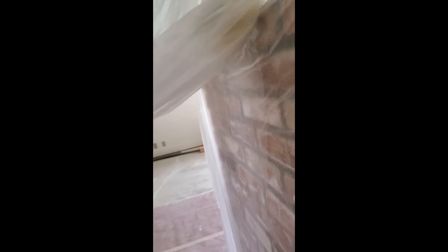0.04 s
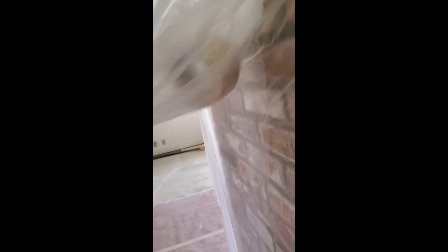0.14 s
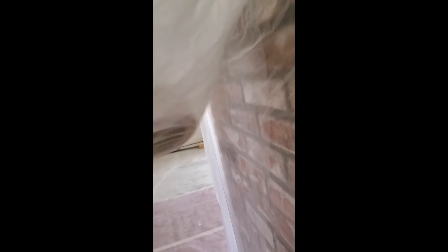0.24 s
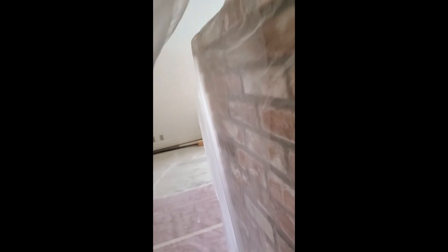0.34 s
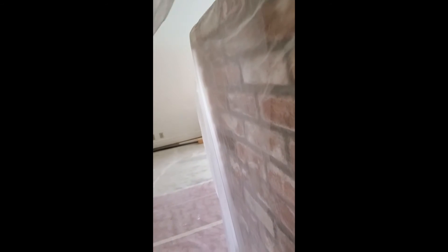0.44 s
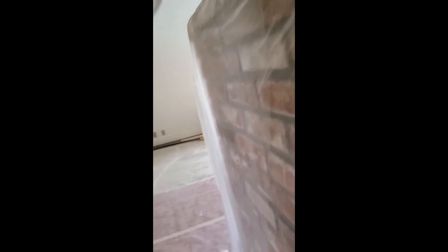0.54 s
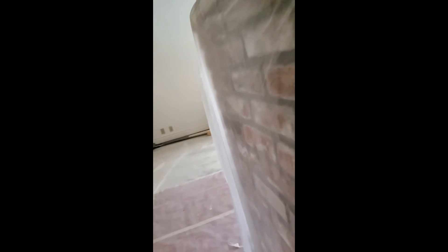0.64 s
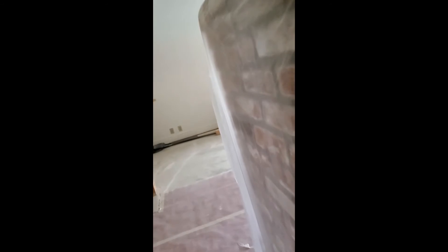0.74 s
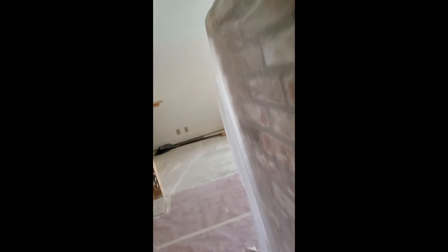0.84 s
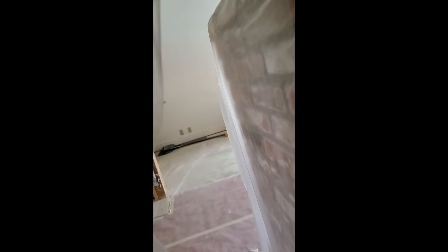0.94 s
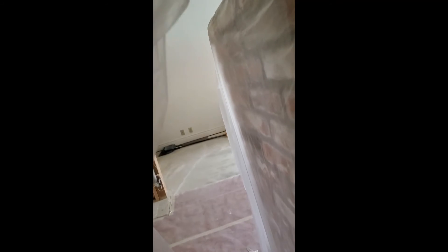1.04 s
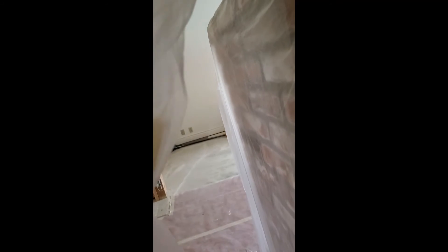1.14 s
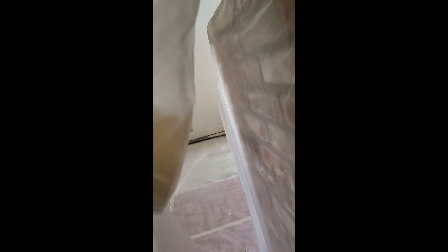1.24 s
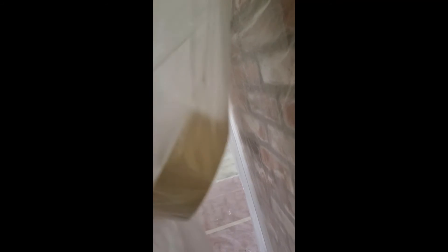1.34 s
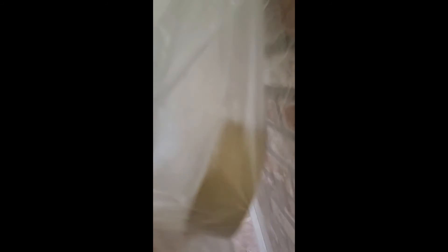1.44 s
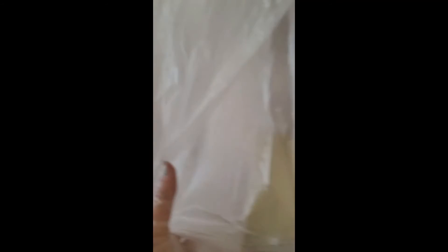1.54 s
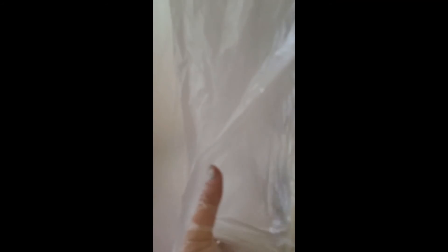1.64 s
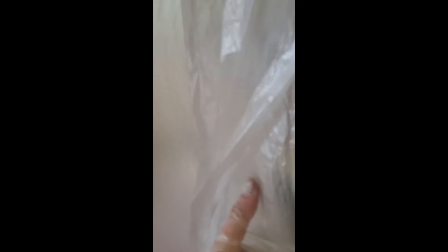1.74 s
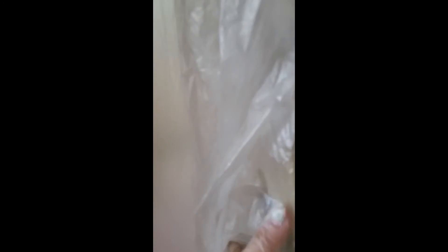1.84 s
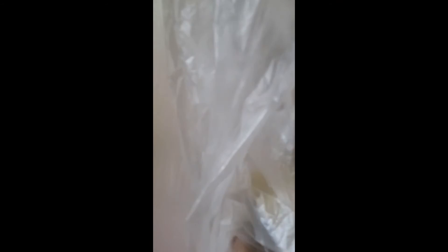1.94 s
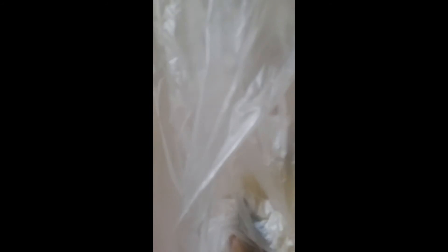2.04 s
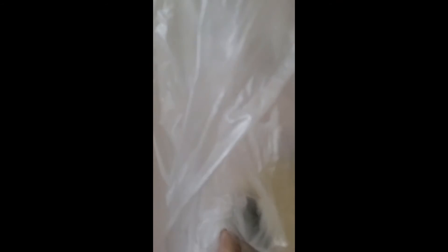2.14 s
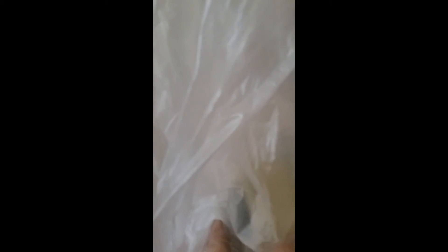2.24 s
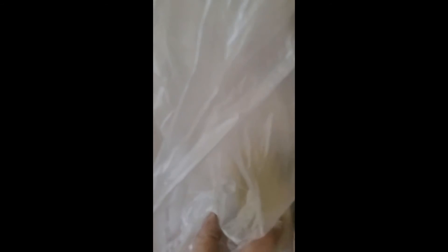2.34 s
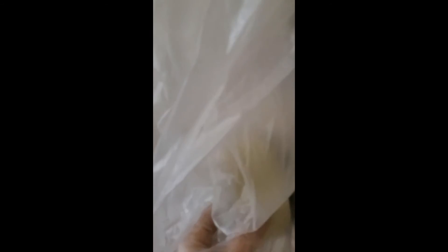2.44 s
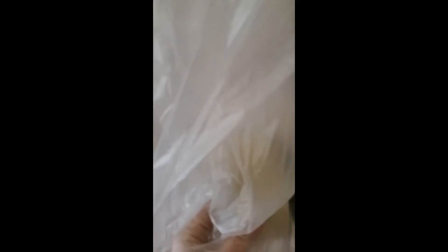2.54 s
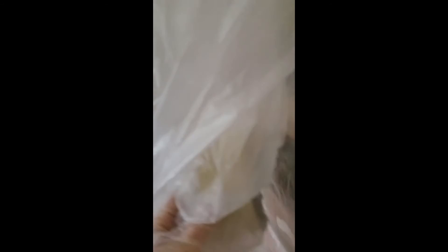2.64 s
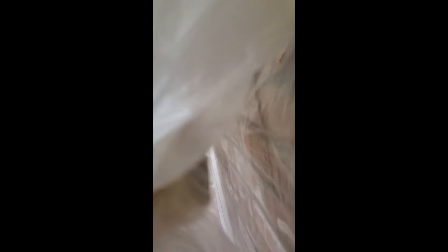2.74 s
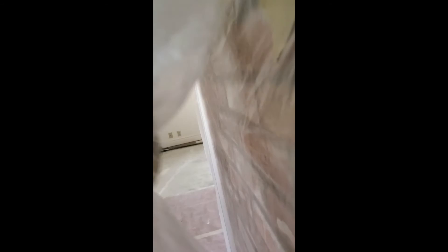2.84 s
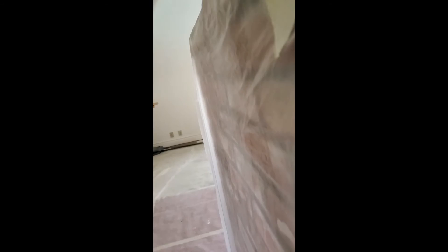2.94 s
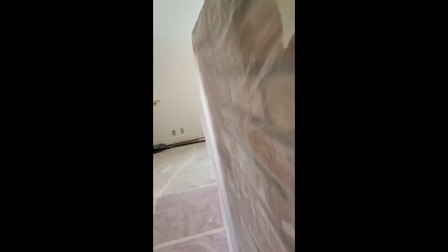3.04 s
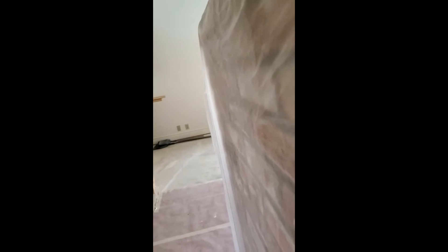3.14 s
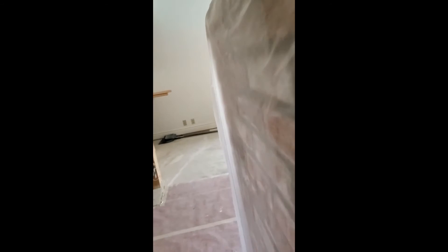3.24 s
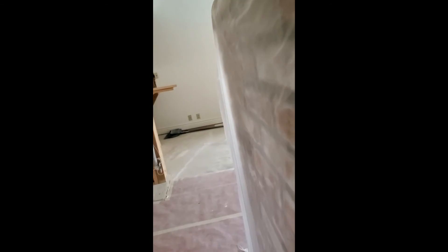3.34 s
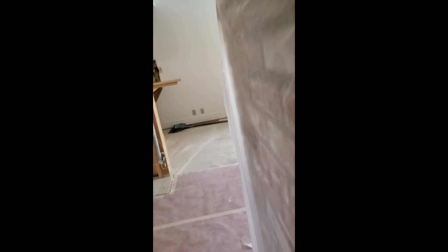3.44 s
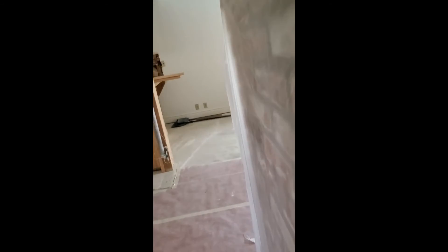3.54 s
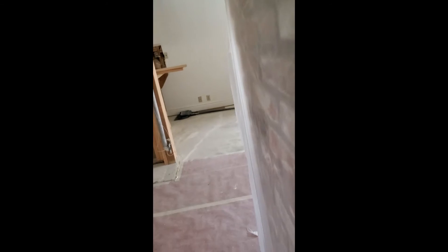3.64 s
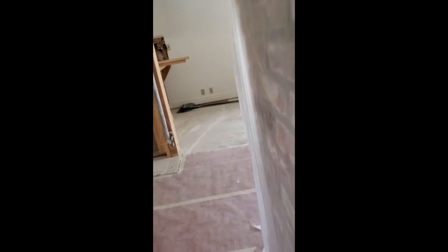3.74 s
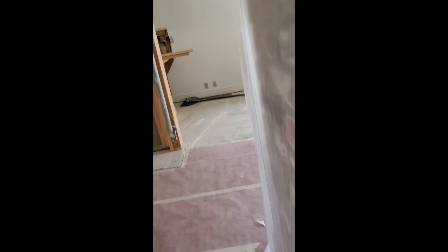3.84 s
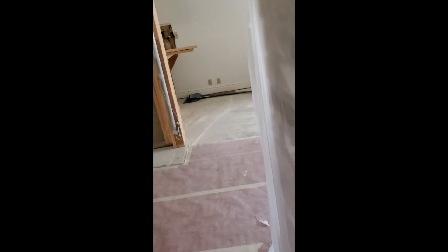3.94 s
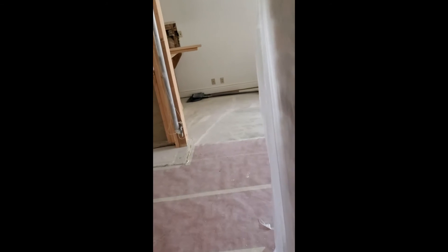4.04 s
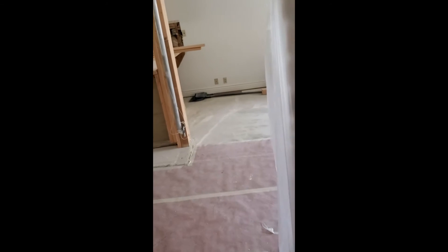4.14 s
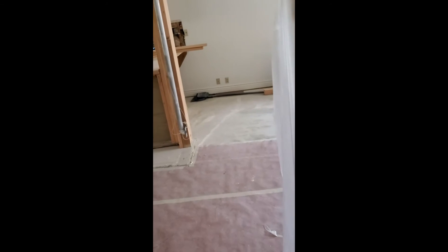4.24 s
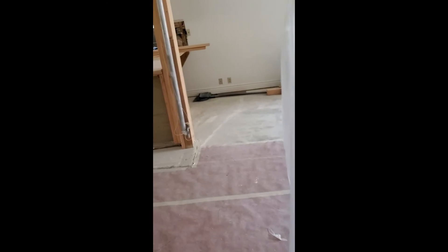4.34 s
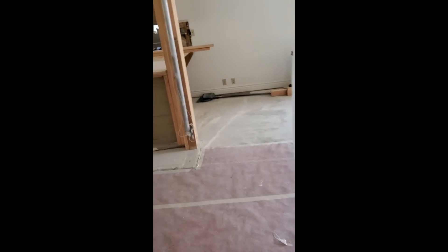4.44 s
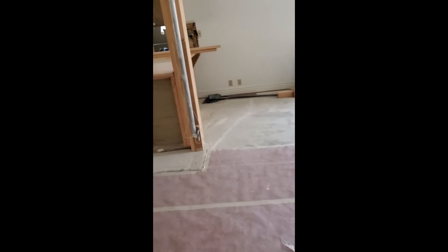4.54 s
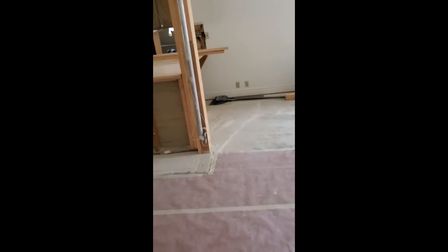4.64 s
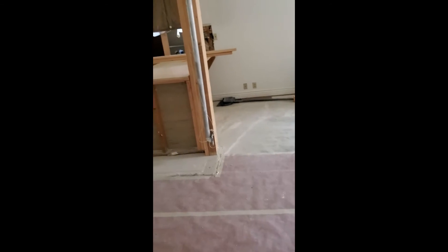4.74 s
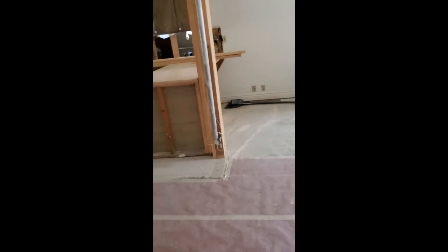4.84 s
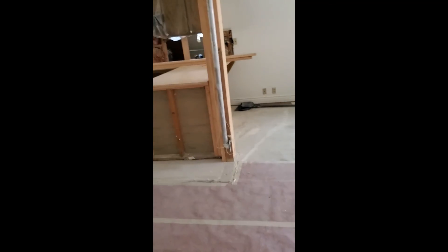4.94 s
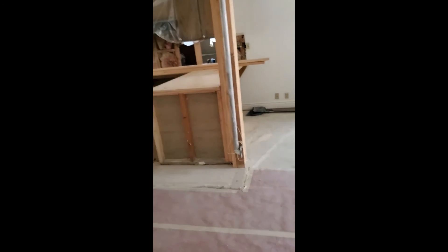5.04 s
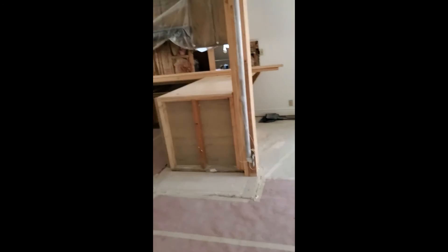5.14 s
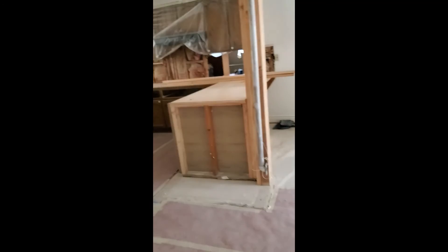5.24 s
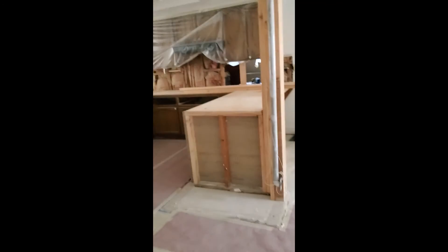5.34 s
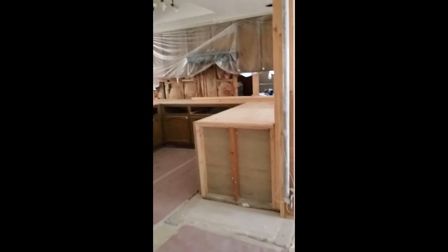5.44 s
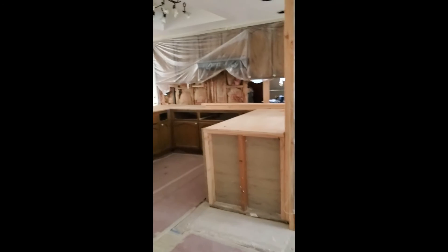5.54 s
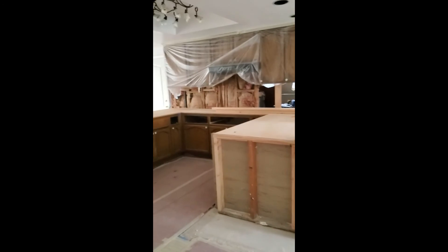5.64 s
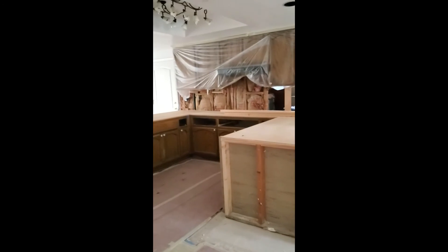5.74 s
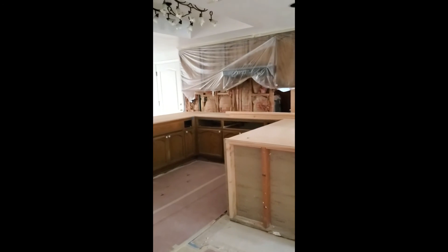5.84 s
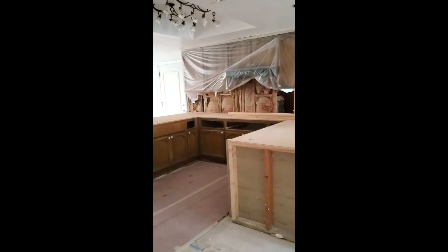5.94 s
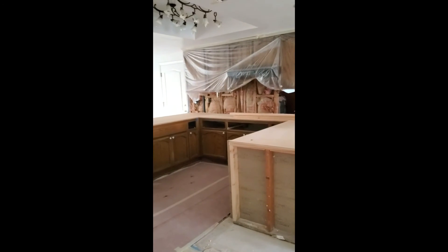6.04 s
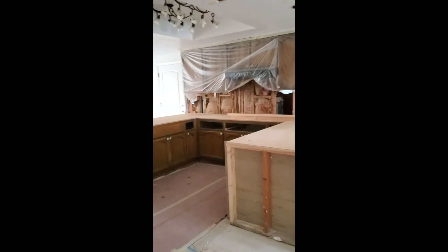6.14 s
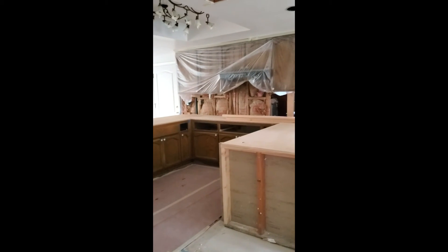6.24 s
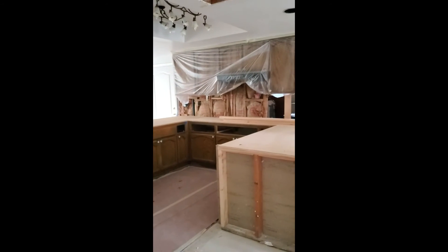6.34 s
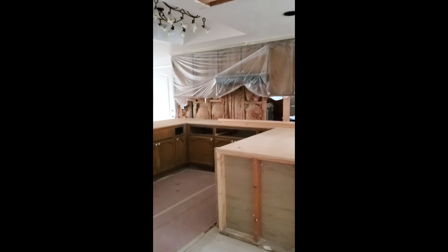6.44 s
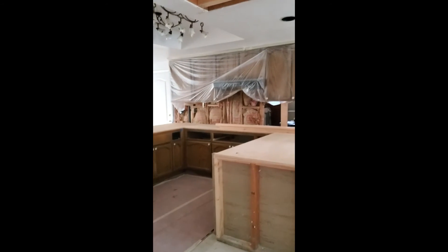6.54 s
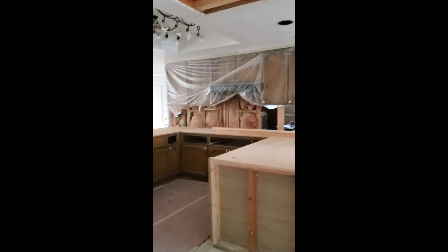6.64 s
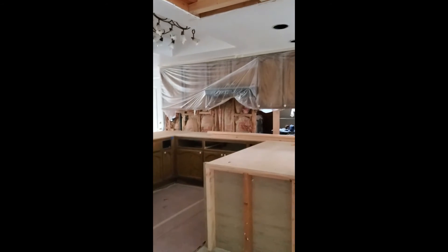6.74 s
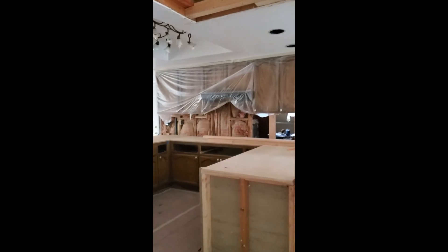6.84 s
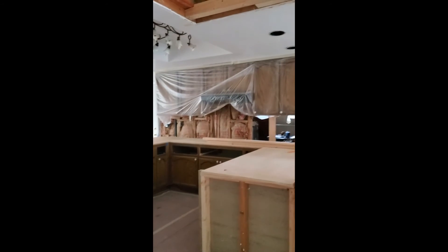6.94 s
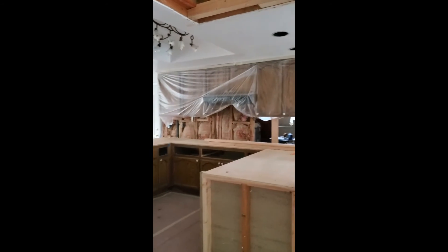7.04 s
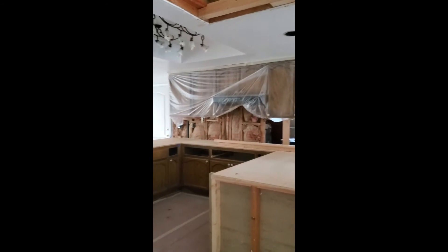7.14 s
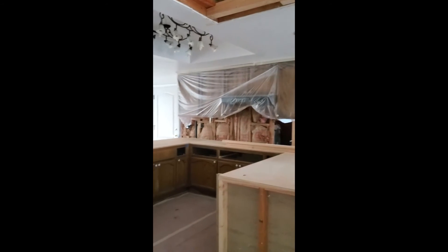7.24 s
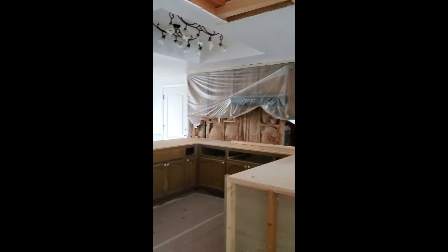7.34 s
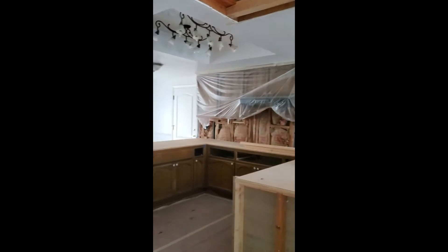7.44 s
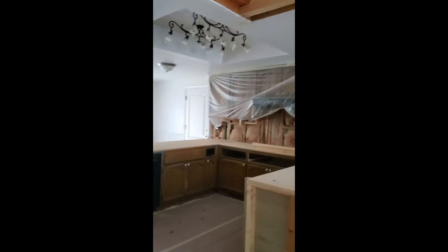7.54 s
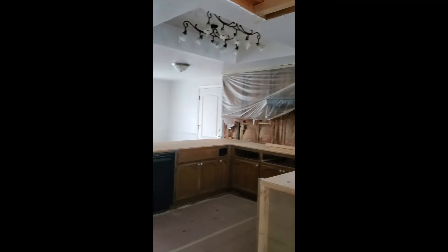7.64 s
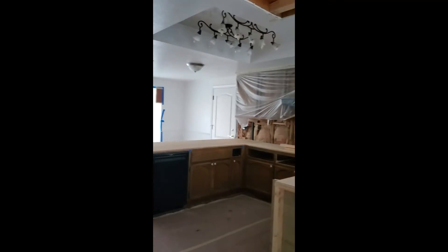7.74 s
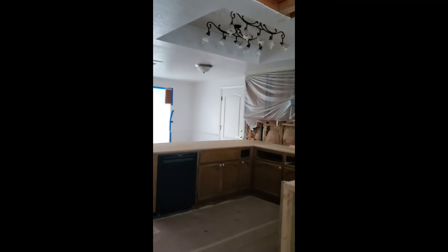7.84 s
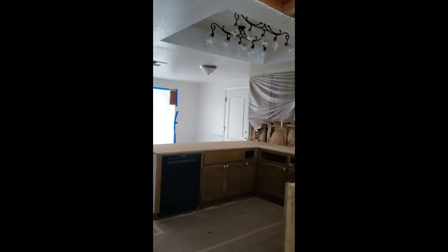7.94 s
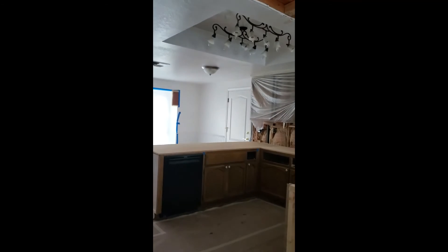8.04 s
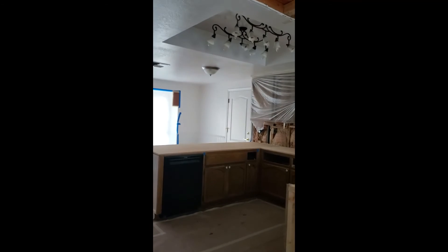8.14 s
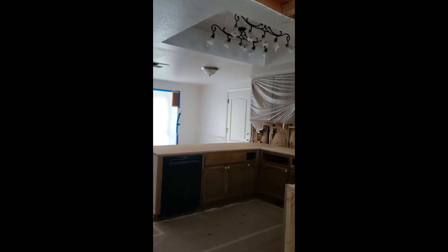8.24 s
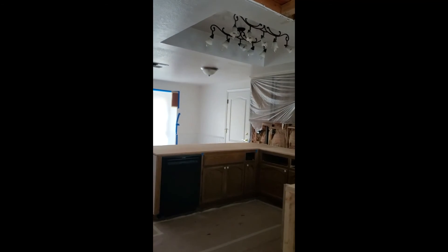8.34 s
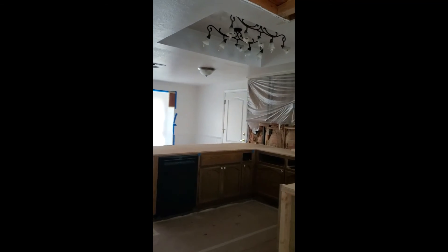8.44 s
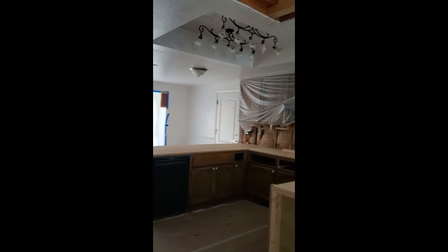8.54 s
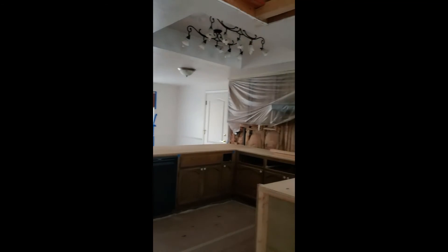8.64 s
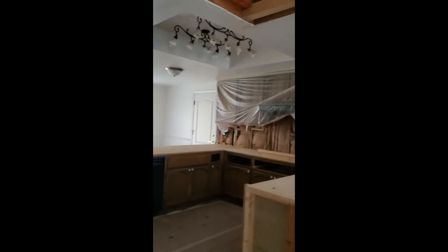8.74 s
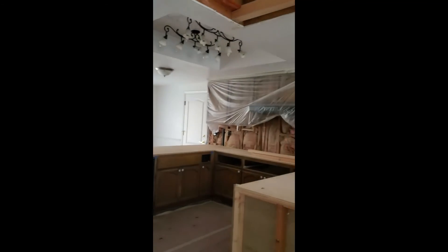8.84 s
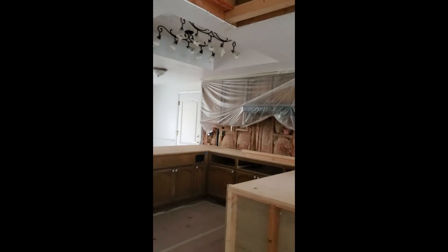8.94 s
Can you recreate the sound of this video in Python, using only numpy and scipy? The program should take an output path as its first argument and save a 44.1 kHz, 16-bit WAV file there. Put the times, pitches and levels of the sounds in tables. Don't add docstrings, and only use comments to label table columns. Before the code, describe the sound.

Close, crisp plastic film crinkling with soft flaps and air puffs over faint building hum, ending in a short hollow shoe scuff.

```python
import sys
import numpy as np
from scipy import signal
from scipy.fft import rfft, irfft, next_fast_len
from scipy.io import wavfile
from scipy.ndimage import uniform_filter1d

SR = 44100
rng = np.random.default_rng(int(sys.argv[2]) if len(sys.argv) > 2 else 0)


def volts(x):
    e = np.asarray(x, float) / 20
    return 10 ** e


def to_wav(s):
    ch = np.atleast_2d(s).T
    pcm = np.round(np.clip(ch, -1, 1) * 32767)
    wavfile.write(sys.argv[1], SR, pcm.astype(np.int16))


N = 397341


def level(x, db):
    return x * volts(db) / np.sqrt(np.mean(x ** 2))


def curve(table):
    s, *columns = np.transpose(table)
    return [np.interp(np.arange(N) / SR, s, c) for c in columns]


def bumps(table, column=1):
    t = np.arange(0, N + 64, 64) / SR
    out = np.zeros(len(t))
    for row in table:
        start_s, length_s = row[0], row[2]
        width_s = np.where(t < start_s, length_s, length_s * 1.33)
        out += row[column] * np.exp(-((t - start_s) / width_s) ** 2)
    return np.interp(np.arange(N) / SR, t, out)


def colour(x, points):
    hz, db = np.transpose(points)
    size = next_fast_len(N)
    f = np.maximum(np.arange(size // 2 + 1) * SR / size, 1)
    gain = volts(np.interp(np.log(f), np.log(hz), db))
    return irfft(rfft(x, size) * gain, size)[..., :N]


def band(x, lo_hz, hi_hz, order=3):
    return signal.sosfilt(signal.butter(order, [lo_hz, hi_hz], "band", fs=SR, output="sos"), x)


def walk(rate):
    k = int(SR / rate)
    held = np.repeat(rng.standard_normal(N // k + 1), k)
    return 0.78 * uniform_filter1d(held, k)[:N]


def snaps(rate, spread_db, channels=2):
    when, size, sign = rng.random((3, channels, N))
    height = volts(-spread_db * np.log(1.003 - size))
    return (when < rate / SR) * height * (sign - .5)


def alike(x, share):
    share = np.clip(share, 0, 1)
    return np.sqrt(share) * x[0] + np.sqrt(1 - share) * np.array([x[1], -x[1]])


def echo(x, t60_s=0.98, gap_s=0.002):
    t = np.arange(int(SR * .9)) / SR
    tail = rng.standard_normal((2, len(t))) * volts(-60 * t / t60_s) * np.clip(t / gap_s - .5, 0, 1)
    tail = tail / np.sqrt(np.sum(tail ** 2, axis=1, keepdims=True))
    return signal.fftconvolve(np.broadcast_to(x, (2, N)), tail, axes=1)[:, :N]


# pitch_hz, density_db
RUMBLE = [(12, -36), (20, -12), (59, 0.5), (80, 3.5), (128, -25), (233, -16), (410, -5), (700, -11),
          (910, -63), (1540, -120)]


def house():
    rumble = level(colour(alike(rng.standard_normal((2, N)), 0.66), RUMBLE), -61.5)
    rumble = rumble * volts(2.8 * walk(3.4))
    hum_hz = 58.4 + 3.9 * walk(6.5)
    hum = np.sin(2 * np.pi * np.cumsum(hum_hz) / SR) * volts(-63 + 4.8 * walk(3.24))
    return rumble + hum


# pitch_hz, gain_db
GRIPPED_PORT = [(300, -11), (700, -32), (1300, -5), (2200, -3), (2800, -5.5), (3300, -2), (4200, -1.5),
                (6400, -5.5), (7050, -4), (7400, -40), (7650, -8), (8300, 4), (12000, 3), (15700, 2)]
# pitch_hz, gain_db
OPEN_PORT = [(1100, -3.5), (1500, -6.5), (2000, -3), (2550, -8), (2800, -13.5), (3100, -9), (3550, -7),
             (5000, -7.5), (7000, -6), (8000, -5), (8800, -2), (12000, 0.5), (14200, 2.5), (15700, 1)]


def at_ports(x):
    return np.array([colour(x[0], GRIPPED_PORT), colour(x[1], OPEN_PORT)])


# start_s, rustle_db, distance (0 in hand - 1 behind), left_minus_right_db
DRAG_PATH = [(0, -34.5, 0.26, -8), (.1, -26.5, 0, -3), (.3, -27.5, 0, -7), (.46, -30, 0.068, -5),
             (.65, -33.5, 0.096, -9), (1.25, -33.5, 0.23, -6), (2.2, -34.5, 0.1, -7),
             (2.6, -35.5, 0.56, -6), (3.04, -37, 0.11, -8.5), (3.44, -37.5, .1, -6.5),
             (3.52, -40.5, 0.37, -6.5), (4.5, -44.5, 0.35, -7.5), (4.87, -42.5, 0.47, -7.5),
             (5.2, -39, 0.67, -8), (5.72, -39, 0.63, -7), (6.4, -42, 0.93, -6), (8.6, -41.5, .8, -5.5),
             (8.96, -52, 0.93, -6.5)]


def drag():
    return curve(DRAG_PATH)


# start_s, above_drag_db, length_s, left_minus_right_db
SUDDEN_TUGS = [(.35, 3, 0.042, 1), (.56, 1.5, 0.044, -0.5), (.9, 0, 0.041, 0), (1.1, 0.5, .08, -1),
               (1.34, 4, 0.037, 2), (1.6, 0, .06, 0.5), (1.84, 1.5, 0.04, 3), (2.05, -2, 0.029, 0),
               (2.28, 2, 0.036, 0), (2.36, 2.5, 0.045, -1), (2.43, 4.5, 0.027, -1.5), (2.82, 6.5, 0.089, 1),
               (2.95, 3, .05, 0), (3.4, 1.5, 0.043, 0), (4.1, 2.5, 0.068, -0.5), (4.21, 4, .04, -1),
               (4.3, -2, .025, -1), (4.36, 3, 0.052, -1.5), (5.73, 0.5, 0.036, -2), (5.835, 3, 0.015, 1),
               (6.52, 2, .05, 0.5), (7.0, 3, 0.085, 0.5), (7.14, 0, 0.024, 0), (7.21, 3.5, 0.029, -1),
               (7.3, 4.5, 0.084, 0), (7.93, 5, 0.084, 1), (8.08, 3, 0.076, 0.5), (8.2, 6, 0.065, -1),
               (8.48, -2.5, 0.12, -1), (8.66, 2.5, 0.074, .5)]
# start_s, above_rest_db, length_s
FOLD_ROLLS = [(.3, 1.5, 0.1), (1.68, 0, 0.027), (1.95, 4.5, 0.21), (2.28, 6.5, .03), (2.38, 7, .08),
              (2.62, 5.5, .08), (2.82, 2.5, .1), (3.9, -2.5, 0.43), (4.35, 6.5, 0.057), (5.2, 9, 0.023),
              (6.4, -0.5, .12), (6.63, 5, 0.027), (6.8, 3, 0.074), (8.64, 13, 0.025), (8.78, 11, 0.087)]


def film():
    drag_db, far, pan_db = drag()
    tug_db = bumps(SUDDEN_TUGS)
    fine_db = drag_db + tug_db
    pan_db = pan_db + bumps(SUDDEN_TUGS, 3)
    small_db = -5 + 3.43 * far - (1 - 0.82) * tug_db
    middle_db = -10.5 + 7.34 * far - (1 - 0.62) * tug_db
    large_db = -18 + 7 * far - (1 - 0.58) * tug_db + bumps(FOLD_ROLLS)
    crackle = level(snaps(4000, spread_db=2.5), -5.0) * volts(0.18 * (fine_db + 35.0))
    crackle = crackle + rng.standard_normal((2, N))
    crackle = crackle * volts(0.49 * walk(14) + 1.1 * np.array([walk(30), walk(30)]))
    heard = at_ports(crackle)
    creases = level(band(heard, 6000, 17060), 3.04) * volts(0.54 * walk(11))
    creases = creases + level(band(heard, 2890, 6040), 2.76) * volts(small_db + 0.51 * walk(16))
    creases = creases + level(band(heard, 1350, 2850), 2.63) * volts(middle_db + 1.0 * walk(16))
    creases = creases * volts(np.array([pan_db, -pan_db]) / 2 + [[-.4], [.4]])
    folds = alike(crackle, 0.66) * volts([[-1.1], [1.1]])
    folds = level(band(folds, 624, 1325), 1.64) * volts(large_db + 0.88 * walk(13))
    return volts(fine_db) * (creases + folds)


# start_s, above_rest_db, length_s
SHEET_SWINGS = [(0, -5, 0.085), (.19, 2, .05), (.35, 6, .04), (.8, -2.5, 0.14), (1.33, 4, 0.042),
                (2.08, 2.5, 0.28), (2.28, 2, 0.034), (2.7, 5, 0.23), (3.35, -5, 0.082), (3.63, 3, 0.11),
                (4.2, 4, .12), (4.39, 4.5, .04), (4.62, -10, 0.12), (5.07, 2.5, .05), (5.4, 4.5, .08),
                (6.05, -3, 0.032), (6.5, -6, 0.11), (6.74, 8.5, 0.068), (7.17, 6, 0.18), (7.65, -1.5, .15),
                (7.92, 4, .07), (8.2, 5.5, 0.11), (8.67, 10, .05)]
# start_s, above_still_air_db, length_s
AIR_PUFFS = [(.11, 13, 0.091), (.42, 13.5, 0.15), (1.0, 9, 0.19), (1.33, 12, 0.036), (1.49, 9, 0.032),
             (1.75, 12, 0.24), (2.25, 11.5, .07), (2.45, 12, 0.13), (2.76, 18, 0.088), (2.96, 12, .07),
             (3.62, 9, 0.093), (3.97, 8, .07), (4.29, 14, .05), (4.53, 12, .05), (5.28, 9, 0.071),
             (6.0, 11, 0.083), (6.15, 14, 0.027), (6.63, 8, .06), (7.3, 7, 0.084), (8.11, 7, .05),
             (8.44, 13, .05), (8.67, 16, .08)]


def flap():
    drag_db, far, _ = drag()
    effort_db = drag_db + 41
    thud_db = -57 + 0.59 * effort_db + bumps(SHEET_SWINGS)
    air_db = -65.5 + 0.33 * effort_db + bumps(AIR_PUFFS)
    strikes = alike(level(snaps(600, spread_db=3.0), -1.9) + rng.standard_normal((2, N)), 0.71)
    air = alike(rng.standard_normal((2, N)), 0.81)
    # low_hz, high_hz, level_db, gain_with_distance_db
    panels = [(138.0, 238, -5.0, -6), (231.0, 376, -3.5, -1), (380, 604, -5.0, 3)]
    thuds = np.zeros((2, N))
    for lo_hz, hi_hz, db, far_db in panels:
        thuds += level(band(strikes, lo_hz, hi_hz), db) * volts(far_db * far + 2.8 * walk(8))
    return volts(thud_db) * thuds + level(band(air, 24, 118, order=2), -0.57) * volts(air_db)


# start_s, peak_db, left_minus_right_db
NEAR_CREASES = [
    (0.0916, -21, -3.0),
    (5.18, -24, -11),
    (7.153, -31, -2.5),
]


def crinkles():
    out, t = np.zeros((2, N)), np.arange(400) / SR
    for s, db, pan_db in NEAR_CREASES:
        cracks = rng.standard_normal((2, len(t))) * np.exp(-t / .0025)
        start = int(s * SR)
        out[:, start:start + len(t)] += cracks * volts(db - 9 + np.array([[pan_db], [-pan_db]]) / 2)
    return volts(3.0) * at_ports(out)


# start_s, peak_db, pitch_hz, length_cycles, edge_tick_re_peak_db
FOLD_POPS = [(1.6728, -23, 428, 0.23, -20), (1.827, -28.5, 500, 0.31, -1.5), (2.212, -36, 385, 0.44, -12),
             (2.261, -36, 211, .5, -20), (2.269, -30, 850, 0.49, -14), (2.284, -37, 850, .6, -14),
             (2.452, -29, 900, 0.38, -3), (2.568, -28, 435, 0.45, -12), (5.1824, -25.5, 340, 0.4, 0.5),
             (6.13, -47, 199, 0.45, -16), (6.6212, -27.5, 577, 0.99, -3), (7.106, -35, 470, 0.9, -6),
             (8.628, -23.5, 900, .5, -14), (8.667, -26.5, 400, 0.39, -25), (8.728, -24, 1100, 0.57, -25),
             (8.807, -32, 794, 0.64, -23)]


def pops():
    near, sent = np.zeros((2, N)), np.zeros(N)
    t = np.arange(-300, 500) / SR
    tick = np.sin(2 * np.pi * 1950 * t) * np.exp(-((t + 0.00055) / 0.0007) ** 2)
    for s, db, hz, cycles, tick_db in FOLD_POPS:
        length = np.where(t < 0, .3, cycles)
        push = 1.17 * np.sin(2 * np.pi * hz * t) * np.exp(-(t * hz / length / 1.06) ** 2)
        at = slice(int(s * SR) - 300, int(s * SR) + 500)
        near[0, at] += volts(db - 1.5) * (np.roll(push, 12) + volts(tick_db + 6) * tick)
        near[1, at] += volts(db + 3.5) * (push + volts(tick_db) * tick)
        sent[at] += volts(db - 17) * (push + volts(tick_db) * tick)
    return near + volts(18.0) * alike(echo(sent, gap_s=0.0045), 0.69)


# start_s, level_db, pitch_hz
SHOE_STROKES = [
    [(8.37, -68, 290), (8.406, -44, 244), (8.456, -51, 239), (8.486, -65, 218), (8.512, -58, 177),
     (8.58, -62, 414)],
    [(8.61, -56, 465), (8.628, -35.5, 456), (8.67, -35, 410), (8.708, -35, 533), (8.752, -34.5, 440),
     (8.818, -36, 510), (8.854, -40.5, 457), (8.986, -60, 478), (9.01, -50, 476)],
]
# pitch_hz, width_hz, level_db
FLOOR_MODES = [
    (112, 17, -2),
    (477, 12, -7),
    (1150, 230, -3),
]


def scuff():
    knocks, t = np.zeros((2, N + 2000)), np.arange(2000) / SR
    for table in SHOE_STROKES:
        s, db, pitch_hz = np.transpose(table)
        span_s = s[-1] - s[0]
        for when, size, tune, side in rng.random((int(330 * span_s), 4)):
            at = s[0] + when * span_s
            hz = np.interp(at, s, pitch_hz) * 2 ** (1.2 * (tune - .45))
            knock = np.sin(2 * np.pi * hz * t) * hz * t * np.exp(-hz * t / 0.61)
            sign = np.sign(tune * 97 % 1 - .5)
            gain = volts(np.interp(at, s, db) + 6.7 * size + 8.5) * sign
            lag = int(SR * 0.00045 * side)
            span = slice(int(at * SR), int(at * SR) + len(t))
            knocks[0, span] += gain * np.roll(knock, lag)
            knocks[1, span] += gain * knock
    knocks = knocks[:, :N]
    struck = knocks.copy()
    for hz, width_hz, db in FLOOR_MODES:
        struck += volts(db + 16.5) * signal.lfilter(*signal.iirpeak(hz, hz / width_hz, fs=SR), knocks)
    return struck + volts(-10.5) * echo(struck)


def scene():
    lows = house() + flap() + scuff()
    return film() + crinkles() + pops() + lows * volts([[-.8], [.8]])


def band_limit(x):
    return signal.sosfilt(signal.butter(12, 17040, fs=SR, output="sos"), x)


def record(dry):
    cut = signal.sosfilt(signal.ellip(12, .3, 75, 15720, fs=SR, output="sos"), dry)
    cut = signal.sosfilt(signal.butter(2, 33, "high", fs=SR, output="sos"), cut)
    return band_limit(cut)


dry = scene()
out = record(dry)
to_wav(out)
```